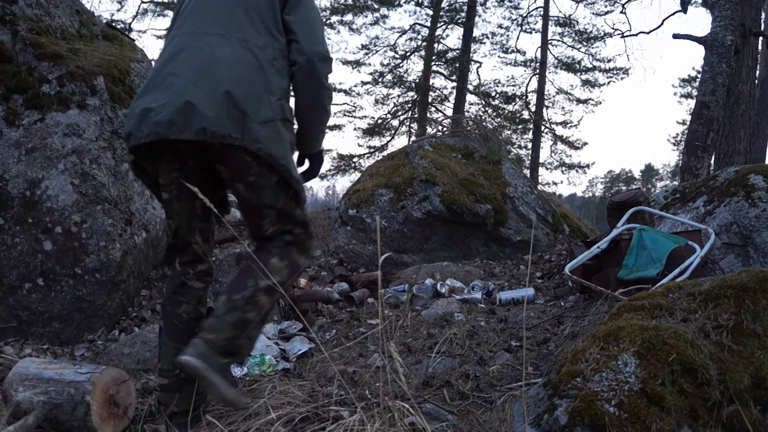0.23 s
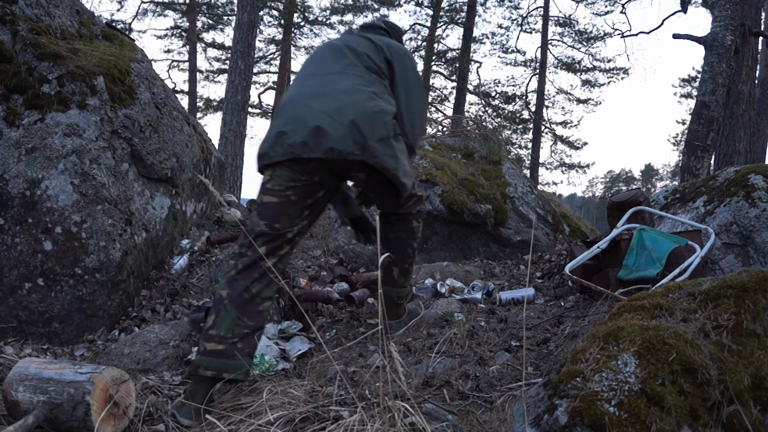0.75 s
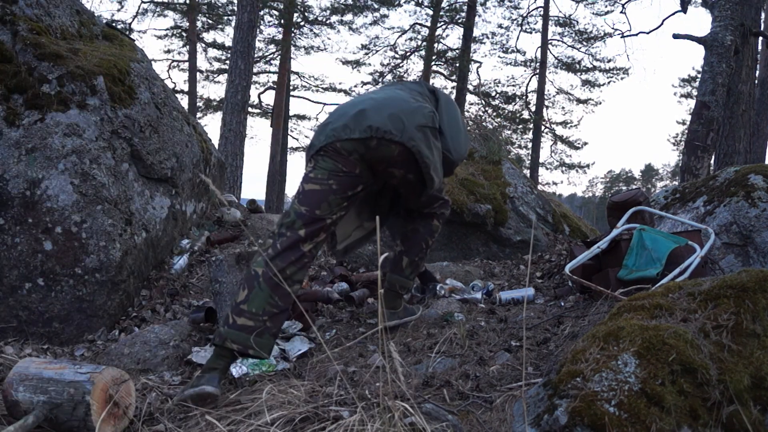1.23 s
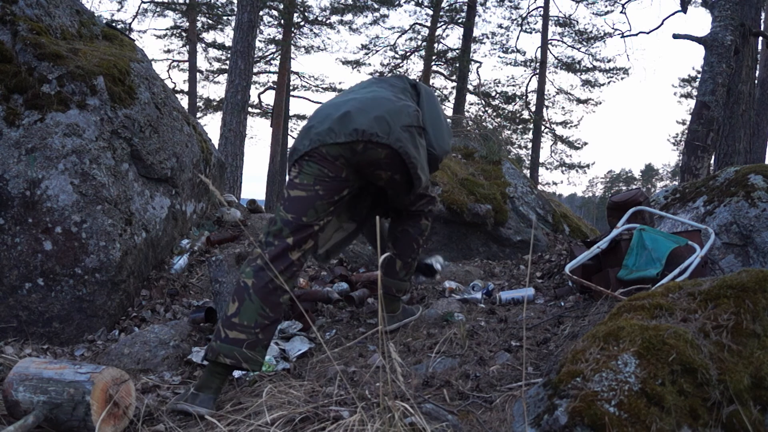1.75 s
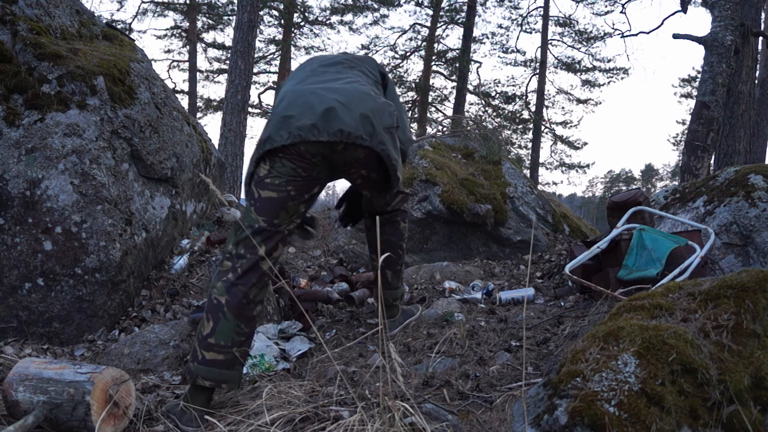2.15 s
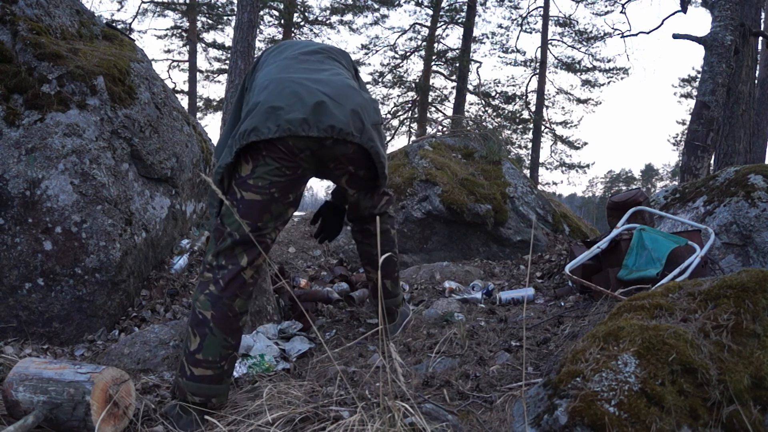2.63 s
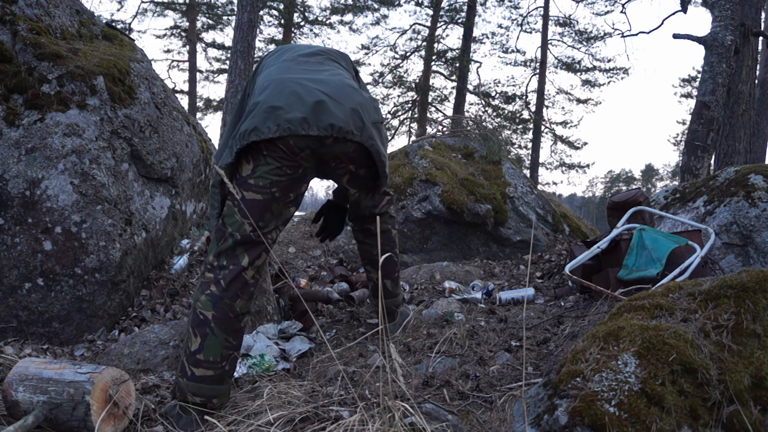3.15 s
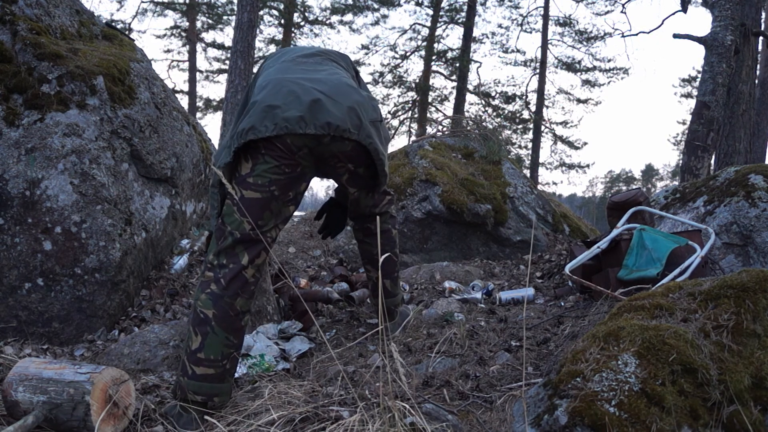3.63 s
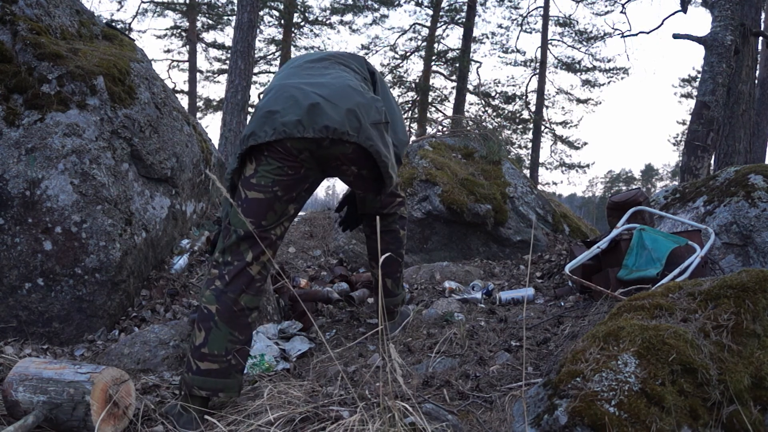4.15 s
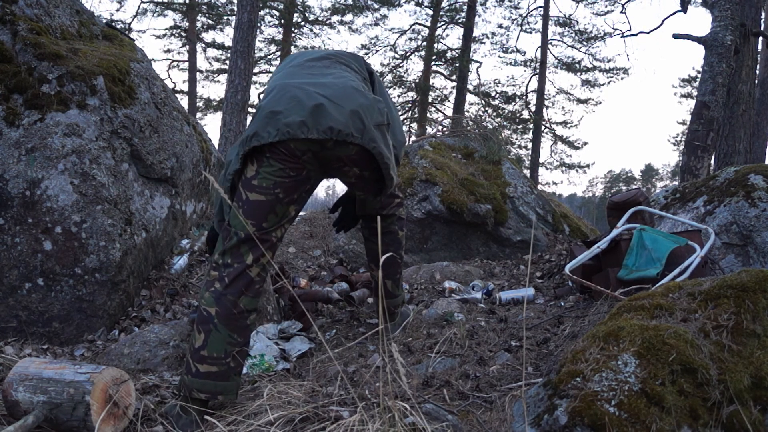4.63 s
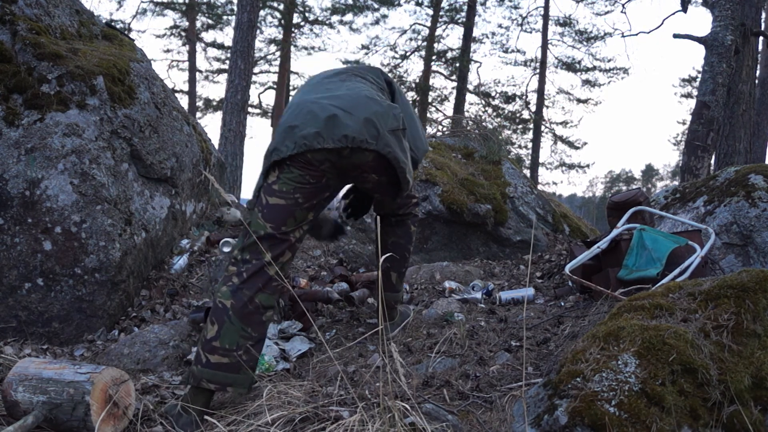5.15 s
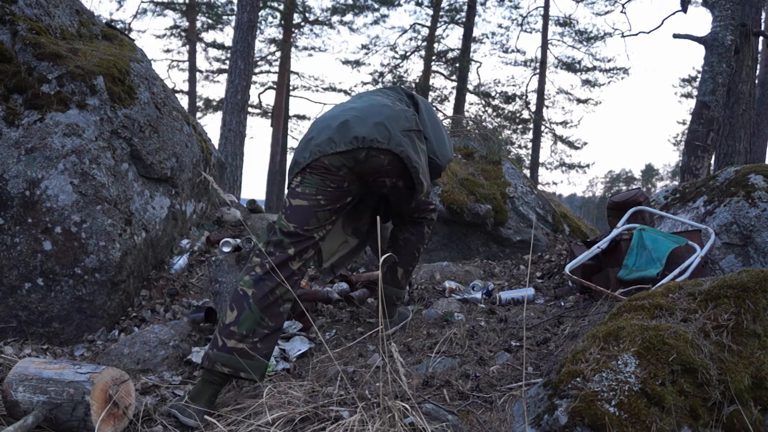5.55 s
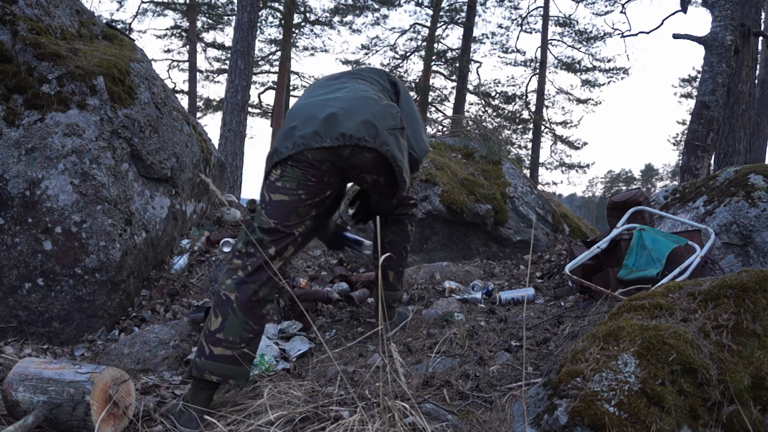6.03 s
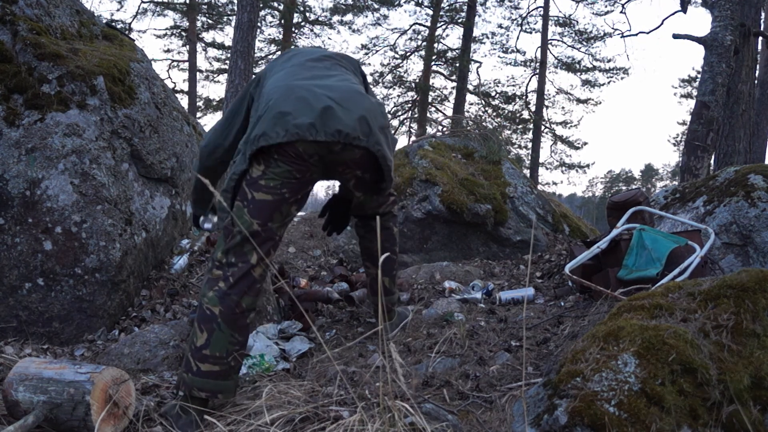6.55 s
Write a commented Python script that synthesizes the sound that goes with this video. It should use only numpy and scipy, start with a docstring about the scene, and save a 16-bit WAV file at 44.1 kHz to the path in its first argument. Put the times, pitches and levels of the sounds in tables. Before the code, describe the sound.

Outdoors at a quiet forest camp, boots crunch dry leaves and a jacket swishes. Twigs snap sharply as thin empty cans begin to rattle, then clatter hard together in a hollow, tinny burst. It settles to faint rustles, small clicks and bird whistles, until a twig cracks and two cans knock near the end. Close stereo microphone, with a faint woodland tail.

```python
"""Boots crunch through dry leaves at a forest camp, a jacket swishes and small birds whistle.
Someone bends down and gathers empty cans, which knock and rattle on the ground as twigs snap.
Cans are clicks that ring tuned modes; twigs, steps, leaves and cloth are shaped, grainy noise.
Birds are gliding sines, near ones with an echo off a boulder, far ones scattered by the pines."""
import sys
import numpy as np
from scipy import signal
from scipy.fft import rfft, irfft, next_fast_len
from scipy.io import wavfile
from scipy.ndimage import uniform_filter1d

SR = 44100
rng = np.random.default_rng(int(sys.argv[2]) if len(sys.argv) > 2 else 0)


def store_pcm(level_fs):
    """Save levels as 16-bit WAV."""
    pcm = np.round(np.clip(level_fs, -1, 1) * 32767).astype(np.int16)
    wavfile.write(sys.argv[1], SR, np.atleast_2d(pcm).T)


N = 299439
TIME = np.arange(N) / SR
HIT_TIME = TIME[:SR // 3]   # every hit lasts at most a third of a second
HIT_SIZE = len(HIT_TIME)
# t60 below is the time in seconds in which a sound dies away by 60 dB


def from_db(db):
    """Turn decibels into a factor for the waveform."""
    return 10 ** (np.asarray(db) / 20)


def rms_one(x):
    """Scale to unit power."""
    return x / np.sqrt(np.mean(x ** 2) + 1e-20)


def even_start(x, size=900):
    """Scale to unit power over the first samples of a hit."""
    return x / np.sqrt(np.mean(x[..., :size] ** 2) + 1e-20)


def at_hz(points, hz):
    """Read a table of (f/Hz, value) between its points, on a log-frequency axis."""
    f, value = np.transpose(points)
    return np.interp(np.log(np.maximum(hz, 1)), np.log(f), value)


def add(out, s, sound):
    """Mix a sound in at time s, in seconds."""
    start = max(0, round(s * SR))
    out[..., start:start + sound.shape[-1]] += sound[..., :N - start]


def band(x, low_hz, high_hz, order=2):
    """Keep only the sound between two frequencies."""
    sos = signal.butter(order, [low_hz, high_hz], "band", fs=SR, output="sos")
    return signal.sosfilt(sos, x)


def drift(rate, size=N):
    """Wander at random with unit power, through `rate` new values a second."""
    values = rng.standard_normal(size)
    return rms_one(np.interp(np.arange(size) * rate / SR, np.arange(size), values))


def dying(t60):
    """Fade one hit exponentially."""
    return from_db(-60 * HIT_TIME / t60)


def ring(x, hz, t60):
    """Let each unit click set off a fading sine of height 1."""
    r, w = from_db(-60 / (t60 * SR)), 2 * np.pi * hz / SR
    return signal.lfilter([0, np.sin(w)], [1, -2 * r * np.cos(w), r * r], x + 1e-18)


# basic stereo spread of the noises, before each one's own width: (f/Hz, side minus middle level/dB)
STEREO_SPREAD = [(50, -5), (150, -11.5), (600, -10.5), (1400, -6), (2800, -4), (5500, 0.5), (12000, 0)]


def noise(spectrum, size, grain_db, width_db=0):
    """Colour uneven grains of noise, spread in stereo by frequency; the middle has unit power."""
    hz = np.fft.rfftfreq(size, 1 / SR)
    sizes = np.minimum(rng.exponential(1, size), 5)
    grain_gain = from_db(grain_db * np.repeat(sizes, 8)[:size])   # each grain lasts 8 samples
    grains = rng.standard_normal((2, size)) * grain_gain
    mid, side = rfft(grains) * from_db(at_hz(spectrum, hz))
    mid = irfft(mid, size)
    side = irfft(side * from_db(at_hz(STEREO_SPREAD, hz) + width_db), size)
    return np.array([mid + side, mid - side]) / mid.std()


def forest(x, t60, top_hz):
    """Trunks scatter sound into a thin, dull tail, made here by convolving it with fading noise."""
    t = TIME[:SR]
    scatter = noise([(90, -22), (350, -2), (top_hz, 0), (20000, -14)], SR, 2.5)
    tail = scatter * from_db(-60 * t / t60) * np.minimum(t / 0.0056, 1)
    tail = tail / np.sqrt(np.sum(tail ** 2) / 2)
    return signal.fftconvolve(np.atleast_2d(x), tail, axes=1)[:, :N]


# can contacts; levels are before the trims of each layer:
# (t/s, hollow body level/dB, rattle level/dB, leafy fizz level/dB, chatter t60/s,
#  main note f/Hz, main note level/dB against the other modes)
CAN_CONTACTS = [(1.115, -19, -35, -27, 0.28, 1080, 1), (1.188, -18, -37, -31.5, .21, 830, 0),
                (1.205, -19.5, -32.5, -26.5, 0.13, 990, -10), (1.214, -17, -33, -36, 0.16, 1044, -6),
                (1.274, -17, -35, -34, 0.088, 1120, 2), (1.437, -21, -35, -28, 0.36, 1270, -5),
                (1.457, -20.5, -31, -30.5, 0.14, 886, 4), (1.567, -19, -36, -35, 0.16, 990, 4),
                (1.618, -7.5, -22.5, -29, .14, 1029, 0), (1.63, -12, -36, -31.5, 0.07, 1000, -3),
                (2.456, -4, -29, -37, 0.17, 1144, 2), (2.467, 1, -21, -28.5, .14, 1210, -8),
                (2.476, -30, -20, -34, 0.14, 1110, 3), (2.486, -3.5, -23.5, -27.5, 0.15, 1162, 4),
                (2.526, -14.5, -30, -43, 0.31, 884, -17), (2.576, -16.5, -41, -58, 0.27, 870, 8),
                (2.634, -18.5, -43, -58, 0.51, 674, 4), (2.653, -15.5, -34.5, -47, 0.56, 1235, 1),
                (2.661, -6, -30.5, -37, 0.19, 862, -1.5), (2.701, -9.5, -35.5, -40.5, .16, 1150, 10),
                (2.725, -14, -43, -60, 0.18, 895, -1), (2.778, -8.5, -36.5, -46, 0.32, 924, 2),
                (2.818, -28, -45, -59, 0.56, 940, -6), (2.851, -18, -43, -57, 0.11, 810, 0),
                (2.941, -2, -22, -39, 0.18, 992, 2), (4.07, -29.5, -65, -66, .2, 947, 3),
                (4.139, -27.5, -48, -48, 0.35, 1164, -4), (4.229, -37, -50, -53, .24, 900, 4),
                (6.72, -9, -39, -40, 0.22, 1176, 4.5), (6.746, -7, -33.5, -38, 0.18, 1860, -1.5)]
# ring of the hollow cans, before each blow varies it: (f/Hz, level/dB, t60/s)
CAN_MODES = [(552, -8, 0.11), (674, -3, 0.073), (764.5, -5, 0.12), (812, -9, 0.087), (918, 7, 0.041),
             (997, 2, 0.085), (1088, -6, 0.067), (1161, -2, 0.098), (1254, -7, 0.076), (1384, 0.5, 0.048),
             (1635, -9.5, 0.11), (1756, -4, 0.053), (1760, -29, 0.033)]
# ring of the thin can walls, before each blow varies it: (f/Hz, level/dB, t60/s)
WALL_MODES = [(2030, 23, 0.032), (2290, -5.5, 0.24), (2730, -24, 0.035), (2800, -13, 0.11),
              (3100, -27, 0.068), (3380, -3, 0.051), (3467, 12, 0.068), (3800, -23, 0.044),
              (4030, -17, 0.028), (4550, -4, 0.071), (5140, -6, 0.11)]


def cans(body_db=-11.5, wall_db=-8.5, rattle_db=-3.5, fizz_db=-1.5, first_touch=6.2):
    """A first touch and a dying, uneven chatter of contacts ring the hollow shells and thin walls."""
    out = np.zeros((2, N))
    rattle_colour = [(900, -47), (1750, -16), (2400, 2), (3000, -9), (3800, -6.5), (5500, -19), (8000, -43)]
    fizz_colour = [(3500, 13), (6000, 12.5), (10000, 2.5), (16000, -7)]
    for s, level, mid_db, high_db, t60, note_hz, note_db in CAN_CONTACTS:
        # the cans bounce on each other every few ms
        clumps = from_db(1.3 * drift(327, size=HIT_SIZE))
        sparse = rng.random(HIT_SIZE) < .1
        contacts = rng.standard_normal(HIT_SIZE) * sparse * clumps * dying(t60)
        contacts[0] += first_touch

        note = from_db(note_db) * even_start(ring(contacts, note_hz, 0.059))
        # crowded, damped modes blur into a band
        shell = from_db(-5) * even_start(band(contacts, 444, 1800, order=3))
        hollow = even_start(band(struck(contacts, CAN_MODES) + note + shell, 410, 5700))
        walls = band(struck(contacts, WALL_MODES), 990, 5400)
        body = from_db(level + body_db) * hollow + from_db(mid_db + wall_db) * walls
        # the left side hears the pile 0.03 ms before the right
        add(out, s, np.array([body, np.interp(HIT_TIME - 3e-5, HIT_TIME, body)]))

        # the soil thuds in step with the blow, up to a limit
        thud = band(rng.standard_normal(HIT_SIZE) * dying(0.38), 216, 284)
        soil_db = min(level - 37, -54)
        # stronger blows are can on can: the thud drops 2.2 dB per dB above -4.5 in the table
        soil_db -= 2.2 * max(level + 4.5, 0)
        add(out, s, from_db(soil_db) * even_start(thud))

        rattle = noise(rattle_colour, HIT_SIZE, 0.97, width_db=-1.5) * dying(t60 * 1.12)
        fizz = noise(fizz_colour, HIT_SIZE, 3, width_db=-7.5) * dying(t60 * 0.71)
        scrape = from_db(mid_db + rattle_db) * even_start(rattle * clumps)
        scrape = scrape + from_db(high_db + fizz_db) * even_start(fizz * clumps)
        add(out, s, band(scrape, 400, 19845))
    return out


def struck(contacts, modes, spot_db=2.0):
    """Every blow lands on another spot, so the modes answer with new strengths and slight detuning."""
    total = 0
    for k, (hz, db, t60) in enumerate(modes):
        spot, detune = rng.standard_normal(2)
        sign = (-1) ** k
        mode = ring(contacts, hz * (1 + 0.0025 * detune), t60)
        total = total + sign * from_db(db + spot_db * spot) * mode
    return even_start(total)


# twigs and stalks snapping, before the shared trim and lean to the left:
# (t/s, level/dB, pitch of the break f/Hz, t60/s, treble of the splinters level/dB, left minus right level/dB)
TWIG_SNAPS = [(0.452, -23, 5630, 0.024, 5, 4), (1.278, -18.5, 7000, 0.031, -3, -4),
              (1.337, -3.5, 4300, 0.045, -9, -3.5), (1.527, -5.5, 2700, 0.045, -13, -3.5),
              (1.72, -16, 5200, .026, 6, -2), (1.795, -12.5, 2960, 0.08, -5, -3),
              (1.812, -19, 4900, 0.12, -3, -4), (2.072, -20.5, 5670, 0.013, 9, -7),
              (2.143, -19, 4140, 0.026, -16, 1), (3.017, -29, 2000, 0.1, -6, 3),
              (3.327, -38, 6000, .05, -3, -5), (3.808, -34.5, 4500, .045, 8, 4),
              (3.904, -34.5, 2200, .045, -15, -5), (4.143, -30, 9900, .077, -2, 9),
              (4.393, -31.5, 2280, 0.033, -25, 2), (4.529, -19, 5040, .017, 0, 4.5),
              (4.799, -34.5, 4460, 0.036, -9, -2), (5.198, -29, 1700, 0.033, -6, -3),
              (5.469, -26.5, 1350, 0.068, -14, -6), (5.518, -29, 1300, 0.035, -16, -3),
              (5.566, -24, 3220, 0.014, -10, -2), (5.685, -21, 4560, .039, 5, -2),
              (5.72, -24, 4070, 0.099, 0, -4), (5.81, -24, 1980, 0.15, -23, -3),
              (6.088, -7.5, 2100, 0.066, 0, -1.5), (6.14, -21.5, 8240, 0.042, -10, 1),
              (6.349, -23.5, 2600, 0.015, -12, 1)]
# colour shared by every break: (f/Hz, level/dB per Hz)
SPLINTER_COLOUR = [(120, -29), (450, -8), (1000, 0), (1700, -4.5), (4700, -1.5), (10000, -3), (16000, -6.5)]


def snaps(snap_db=-9.0, crack=0.64, crack_t60=0.0088):
    """A sharp break and splintering: noise bursts with a broad twig resonance; dry twigs are brighter."""
    out = np.zeros((2, N))
    grid = np.geomspace(100, 16000, 40)
    treble = at_hz([(2500, 0), (9000, 1)], grid)
    for s, level, hz, t60, treble_db, pan_db in TWIG_SNAPS:
        resonance_db = 11 * np.exp(-(np.log2(grid / hz) / 0.76) ** 2)   # 0.76 sets the width in octaves
        colour = at_hz(SPLINTER_COLOUR, grid) + treble_db * treble + resonance_db
        burst = noise(np.transpose([grid, colour]), HIT_SIZE, 2.24, width_db=-5.5)
        burst = burst * (dying(t60) + crack * dying(crack_t60))
        burst = burst * np.minimum(HIT_TIME / 0.00038, 1)   # quick onset
        burst = even_start(band(burst, 290, 15600), size=150)
        add(out, s, from_db(level + snap_db + pan_db * np.array([[.5], [-.5]])) * burst)
    return out * from_db([[.6], [-.6]])


# boots crushing litter and sticks, and a dull knock at 2.345 s, before the shared trim:
# (t/s, level/dB, pitch f/Hz)
STEPS_AND_KNOCK = [(0.096, -21.5, 740), (0.175, -21, 684), (0.192, -19, 795), (0.256, -21.5, 1120),
                   (0.365, -19, 850), (0.384, -22.5, 593), (0.477, -32, 1090), (0.53, -43, 1040),
                   (0.69, -25, 1220), (2.05, -28, 620), (2.345, -25, 1100), (5.217, -27.5, 726),
                   (6.589, -33, 594)]
# dull thumps on the soil, before the filter: (t/s, level/dB)
SOIL_THUMPS = [(6.089, -33), (6.141, -32)]


def ground(burst_db=-12.0, burst_t60=0.079, thump_hz=306, thump_t60=.14):
    """Boots crush litter, and one dull knock falls, as pitched noise; soft soil thumps as a fading sine."""
    out = np.zeros((2, N))
    for s, level, hz in STEPS_AND_KNOCK:
        colour = [(200, -25), (hz / 1.4, -7), (hz, 0), (hz * 1.42, -8), (9000, -30)]
        burst = noise(colour, HIT_SIZE, 4.4, width_db=-7) * dying(burst_t60)
        add(out, s, from_db(level + burst_db) * even_start(band(burst, 335, 5700), size=400))
    for s, level in SOIL_THUMPS:
        thump = np.sin(2 * np.pi * thump_hz * HIT_TIME) * dying(thump_t60)
        add(out, s, from_db(level) * band(thump, 260, 570))
    return out


# rustle of the moving body and, in the low column around 2.6 to 3 s, the dying clatter of the cans,
# before the trim of each layer: (t/s, low level/dB, middle crackle level/dB, high swish level/dB)
RUSTLE_LEVELS = [(0.0, -42, -43.5, -43.5), (0.43, -40.5, -42.5, -44.5), (1.13, -46.5, -42.5, -43),
                 (1.34, -42.5, -41, -44.5), (1.49, -39, -39, -38.5), (1.62, -38.5, -42, -47),
                 (1.81, -48.5, -45, -46), (2.32, -47, -46, -47.5), (2.5, -44.5, -50, -53),
                 (2.63, -37.5, -57, -55.5), (2.8, -45, -56.5, -58), (3.06, -49, -57, -60),
                 (3.4, -57, -63, -65.5), (3.97, -54, -55.5, -55), (4.2, -48, -55.5, -56),
                 (4.42, -56.5, -58, -59), (4.8, -57, -58.5, -61.5), (5.45, -48.5, -47, -47),
                 (5.82, -53.5, -53.5, -54.5), (6.13, -48, -50, -51.5), (6.43, -55.5, -55, -57),
                 (6.79, -50, -55, -58)]
# colour of the leaf noise: (f/Hz, level/dB per Hz)
LEAF_COLOUR = [(59, -68), (100, -21), (277, -17), (608, 1), (910, -2.5), (1170, 1), (1520, -5.5),
               (2580, -2), (2990, -4.5), (4470, -3.5), (11200, -8), (13800, -12.5), (16000, -20)]


def rustle(low_db=0.0, leaves_db=4.0, swish_db=1.0):
    """Low noise is trodden litter and dying can clatter; leaves crackle above, cloth swishes evenly on top."""
    s, low, middle, high = np.transpose(RUSTLE_LEVELS)
    grains = noise(LEAF_COLOUR, next_fast_len(N), 1.8, width_db=-1)[:, :N]
    shared, out = drift(60), 0
    # each layer: lowest and highest f/Hz, level/dB, flutter/dB
    for low_hz, high_hz, level, flutter_db in [(258, 1430, low + low_db, 2.25),
                                               (1340, 7030, middle + leaves_db, 1.35),
                                               (5570, 19845, high + swish_db, 0.9)]:
        layer = band(grains, low_hz, high_hz, order=3)
        flutter = .7 * shared + .7 * drift(140)
        gain = from_db(np.interp(TIME, s, level) + flutter_db * flutter)
        out = out + gain * layer / layer.mean(axis=0).std()
    return out


def crackles(per_s=17.0, size_db=2.5, crackle_db=-5.0, t60=0.06):
    """Single leaves and stalks give way at random as short noise ticks, louder as the rustle grows."""
    out = np.zeros((2, N))
    times, _, rustle_db, _ = np.transpose(RUSTLE_LEVELS)
    for when, size, pitch, side in rng.random((round(per_s * N / SR), 4)):
        s, hz = when * N / SR, 900 * 9 ** pitch
        tick = band(rng.standard_normal((2, 1500)), hz / 1.6, hz * 1.6) * dying(t60)[:1500]
        tick = even_start(tick + tick.mean(axis=0), size=200)   # the shared part narrows the stereo
        lean_db = np.array([[-1], [1]]) * (12 - 6 * side)   # towards the right
        level = np.interp(s, times, rustle_db) + crackle_db + size_db * min(-np.log(size), 2.5)
        add(out, s, tick * from_db(level + lean_db))
    return out


# jacket sleeves brushing, before the lean to the left: (t/s, length t/s, level/dB)
SLEEVE_BRUSHES = [(0.03, 0.021, -40), (0.1, 0.21, -37), (0.277, 0.018, -41), (0.33, 0.095, -39)]


def jacket():
    """Stiff fabric slides over itself: very bright noise swells and fades in brief swishes."""
    swell = 0
    for s, length, db in SLEEVE_BRUSHES:
        swell = swell + from_db(db) * np.exp(-(2 * (TIME - s) / length) ** 2)
    colour = [(1000, -23), (7000, -5), (11500, 1.5), (16000, -2)]
    cloth = noise(colour, next_fast_len(N), 1.5, width_db=4.5)[:, :N]
    return swell * cloth * from_db([[2.5], [-2.5]])


# clear near whistles and hoarse far calls, levels before the gains for distance; both have the columns
# (t/s, length t/s, share of the note before its turn, start f/Hz, turn f/Hz, end f/Hz, level at the turn/dB)
NEAR_SONG = [(0.0, 0.024, .3, 3140, 3255, 2980, -31), (.035, 0.046, 0.55, 2350, 2440, 2320, -40.5),
             (.295, .085, 0.44, 3040, 3050, 3415, -30.5), (.38, 0.041, 0.52, 3590, 3654, 2930, -36),
             (1.64, 0.048, 0.47, 3520, 3080, 2930, -34.5), (1.698, .05, 0.61, 2950, 4350, 4560, -38),
             (1.765, 0.05, 0.65, 4900, 4350, 4170, -39), (1.9, 0.034, 0.66, 2710, 3240, 2290, -30),
             (1.995, 0.023, .4, 3080, 3470, 2500, -29), (2.1, 0.16, 0.29, 4450, 2990, 2883, -30.5),
             (4.385, .07, 0.72, 2394, 2470, 2380, -53), (4.9, .12, .5, 5950, 5930, 6000, -52)]
FAR_CALLS = [(3.187, 0.023, 0.295, 2350, 2790, 4330, -36.5), (3.218, 0.04, 0.35, 4410, 2813, 2180, -33),
             (4.245, 0.11, 0.42, 2500, 2140, 1800, -41.5), (4.23, 0.11, 0.46, 3950, 3860, 3210, -49),
             (4.505, .075, .55, 2396, 3585, 2450, -39), (5.77, 0.18, 0.33, 3130, 3550, 2920, -46),
             (6.042, 0.026, .45, 2410, 2710, 3270, -35.5)]


def birds(echo_s=.017, echo_db=-7.0, wet_db=-8.5, far_db=-6.5, far_direct_db=-7.0):
    """A boulder repeats the near bird; the far ones are hoarse and come much scattered by the trees."""
    near = whistles(NEAR_SONG, waver=0.0079)
    far = whistles(FAR_CALLS + high_calls(), waver=.015, rasp_hz=280)
    echo = from_db(echo_db) * np.pad(near, (round(echo_s * SR), 0))[:N]
    close = near * from_db([[-2.2], [1.8]]) + echo + from_db(wet_db) * forest(near, 0.43, 4500)
    return close + from_db(far_direct_db) * far + from_db(far_db) * forest(far, 0.35, 8300)


def whistles(notes, waver, rasp_hz=0):
    """Each note is a sine that glides and swells to a turn, then fades; fast pitch swerves make it hoarse."""
    out = np.zeros(N)
    edge_db, turn_s = -7, 0.011   # level at the note's ends against its turn; time the turn takes
    for s, length, turn, *arc_hz, db in notes:
        along = np.linspace(0, 1, round(length * SR))
        corners = [0, np.clip(turn, .05, .95), 1]
        glide = np.interp(along, corners, arc_hz)
        pitch = uniform_filter1d(glide, round(turn_s * SR), mode="nearest")
        pitch = pitch * (1 + waver * drift(718, size=len(along)))
        pitch = pitch + rasp_hz * drift(1800, size=len(along))
        swell = from_db(db + np.interp(along, corners, [edge_db, 0, edge_db]))
        fade = np.clip(np.minimum(along, 1 - along) * length / 0.0025, 0, 1)
        tone = np.sqrt(2) * np.sin(2 * np.pi * np.cumsum(pitch) / SR)
        add(out, s, fade * swell * tone)
    return out


# a thin, high two-note call, repeated, before the gains for distance: (t/s, level/dB)
THIN_CALLS = [(3.449, -49), (4.751, -47), (6.29, -47.5)]
# its two falling notes: (delay t/s, length t/s, share before the turn, start f/Hz, turn f/Hz, end f/Hz,
#  level against the call/dB)
THIN_NOTES = [(0, .095, 0.31, 7750, 7240, 6480, -2), (0.163, .12, .45, 6100, 6050, 5380, 0)]


def high_calls():
    """List the same pair of falling notes for every call."""
    notes = []
    for s, db in THIN_CALLS:
        for delay, *note, note_db in THIN_NOTES:
            notes.append((s + delay, *note, db + note_db))
    return notes


# colour of the still air: (f/Hz, level/dB per Hz)
AIR_COLOUR = [(15, -81), (25, -15), (145, -23.5), (285, -11), (545, -1.5), (863, -23), (1190, -32),
              (1560, -8.5), (2480, -9), (4610, -18.5), (6210, -16), (11900, -25.5), (16000, -28)]


def still_air(air_db=-57.0):
    """The quiet background is steady, wide, coloured noise."""
    return from_db(air_db) * noise(AIR_COLOUR, next_fast_len(N), 0, width_db=6)[:, :N]


def scene():
    """Mix the handling sounds and their forest tail over birds and still air."""
    hits = cans() + snaps() + ground()
    tail = from_db(-15) * forest(hits.mean(axis=0), 0.35, 3200)
    litter = (rustle() + crackles()) * from_db([[1.1], [-1.1]])   # leans left
    return hits + tail + litter + jacket() + birds() + still_air()


def record(dry):
    """Clip the peaks just under full scale, then cut the treble above 15950 Hz."""
    sos = signal.ellip(10, .1, 80, 15950, fs=SR, output="sos")
    return signal.sosfilt(sos, np.clip(dry, -.97, .97))


dry = scene()
out = record(dry)
store_pcm(out)
```